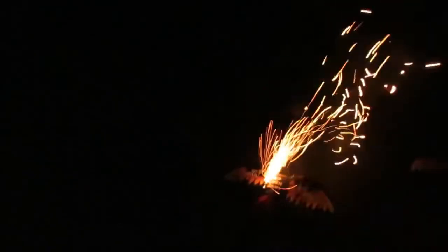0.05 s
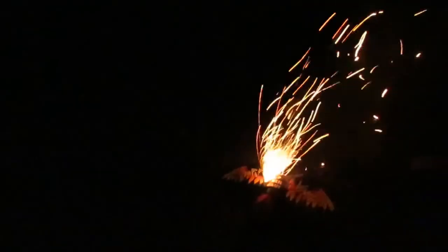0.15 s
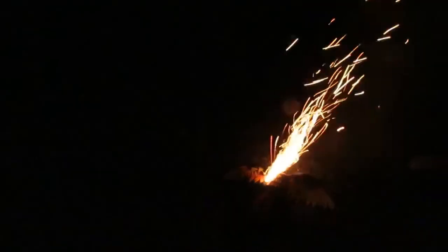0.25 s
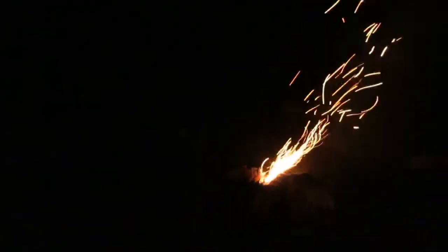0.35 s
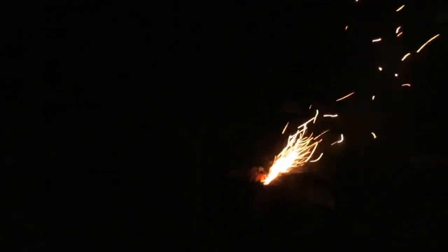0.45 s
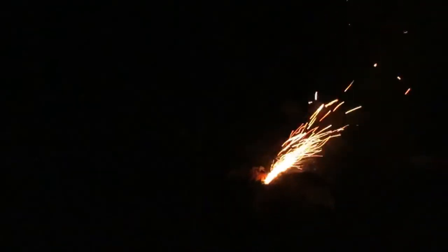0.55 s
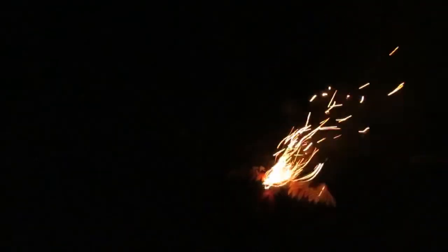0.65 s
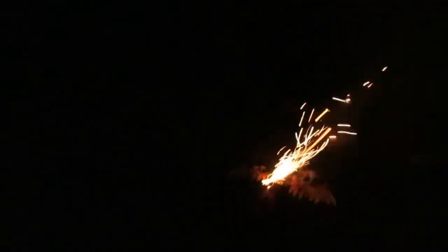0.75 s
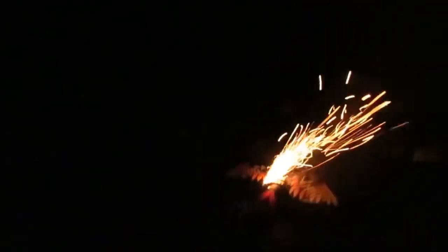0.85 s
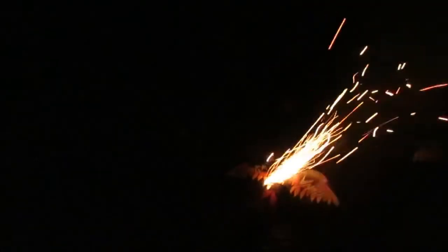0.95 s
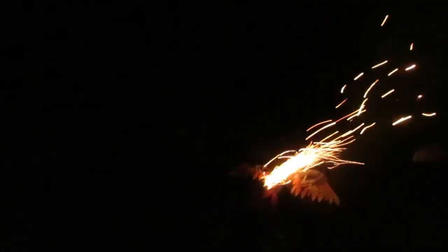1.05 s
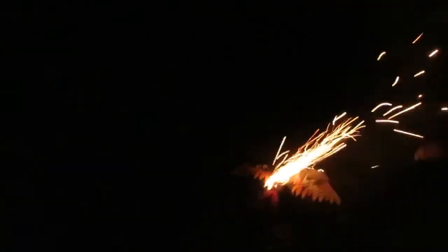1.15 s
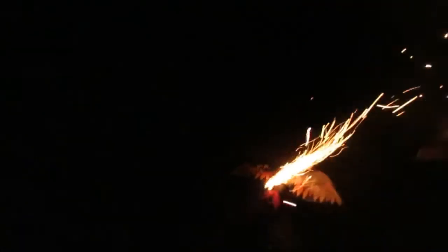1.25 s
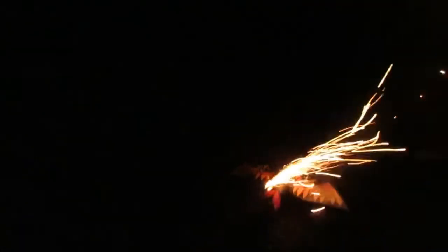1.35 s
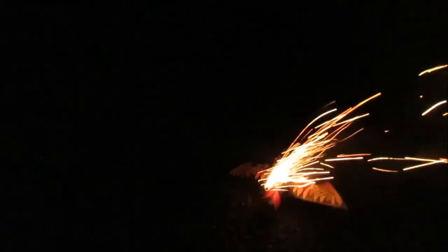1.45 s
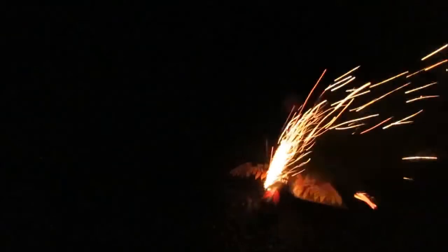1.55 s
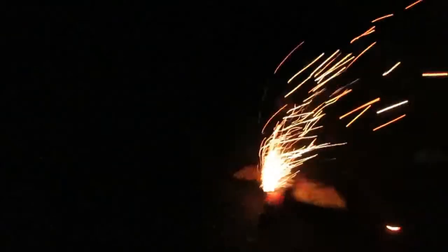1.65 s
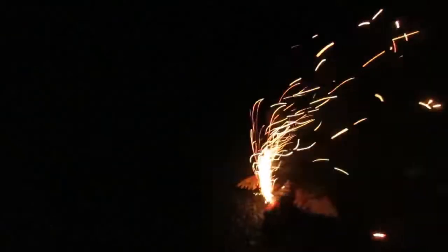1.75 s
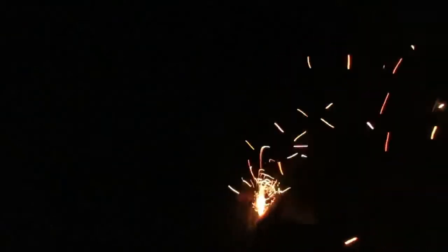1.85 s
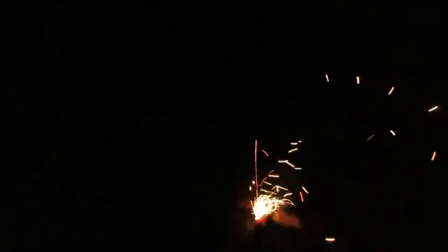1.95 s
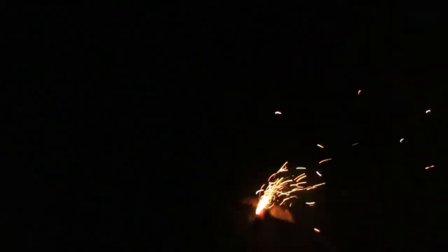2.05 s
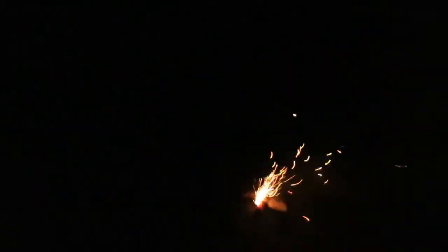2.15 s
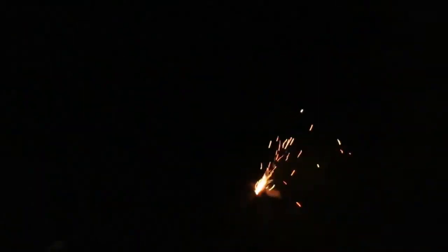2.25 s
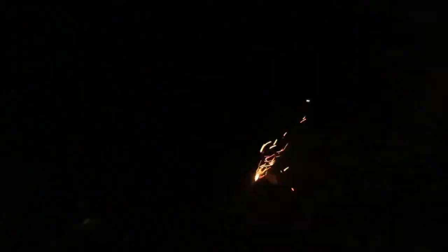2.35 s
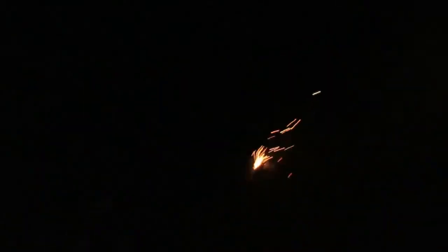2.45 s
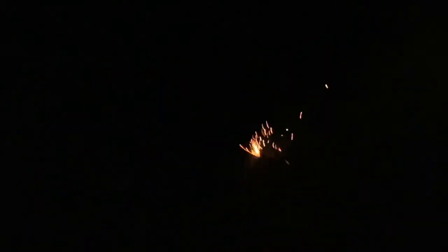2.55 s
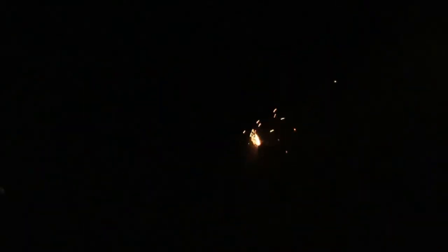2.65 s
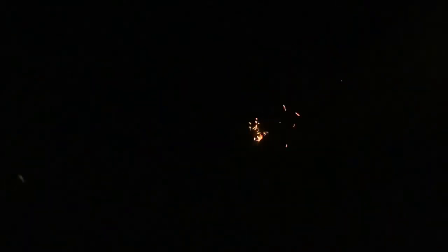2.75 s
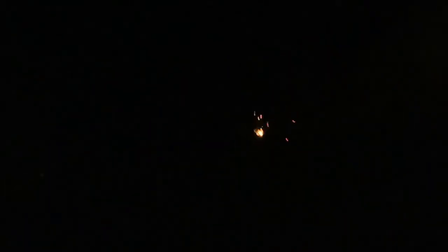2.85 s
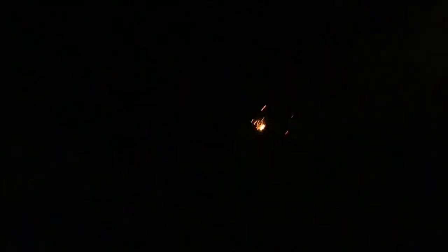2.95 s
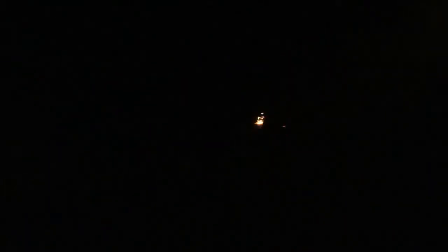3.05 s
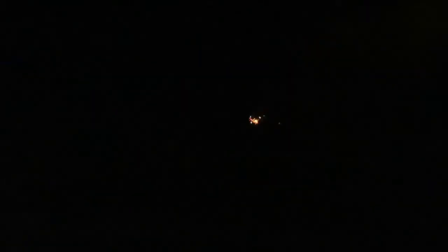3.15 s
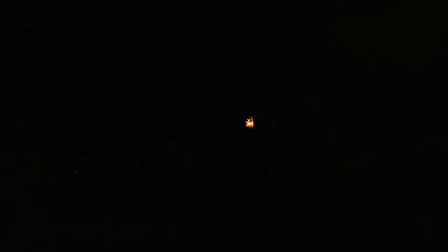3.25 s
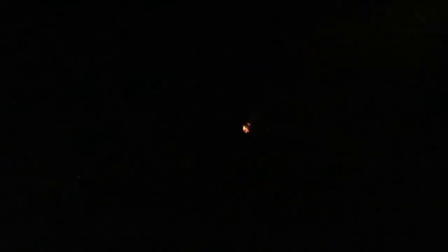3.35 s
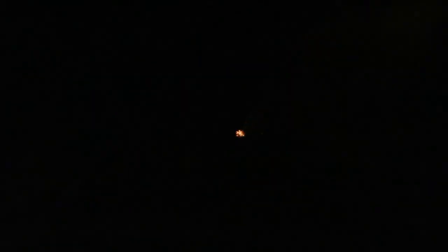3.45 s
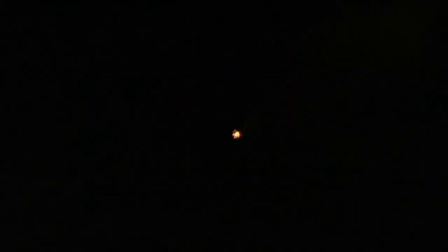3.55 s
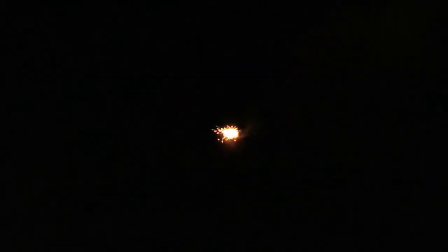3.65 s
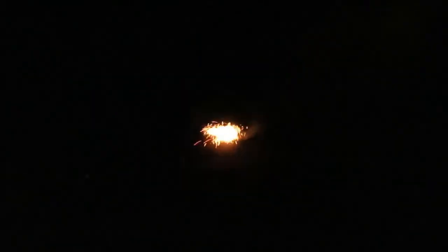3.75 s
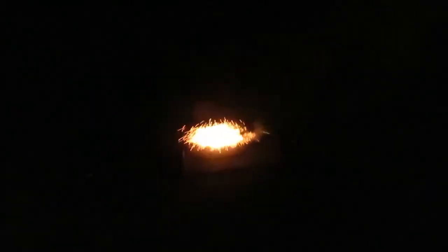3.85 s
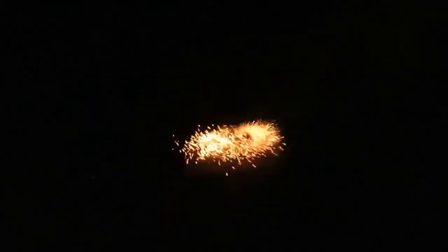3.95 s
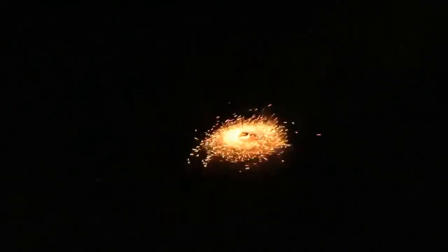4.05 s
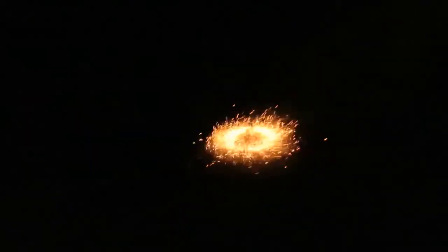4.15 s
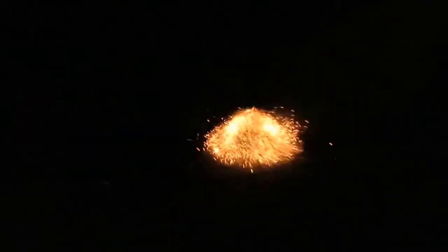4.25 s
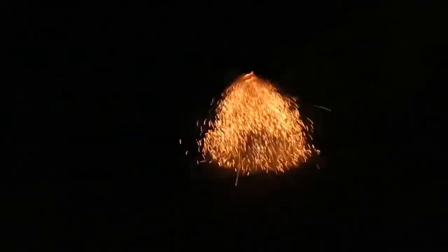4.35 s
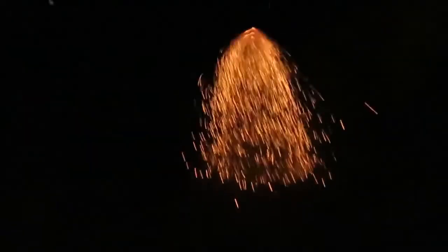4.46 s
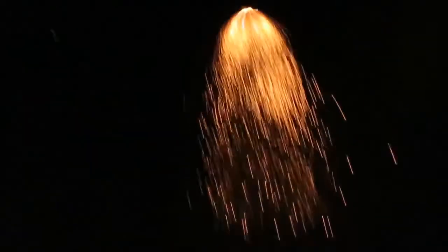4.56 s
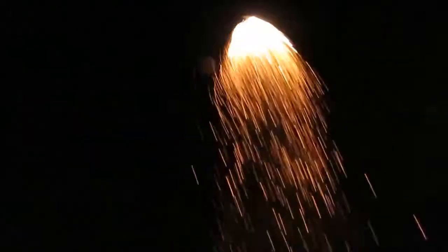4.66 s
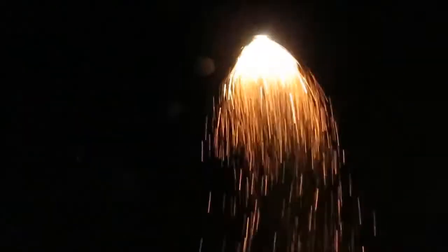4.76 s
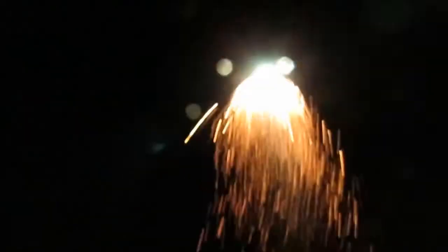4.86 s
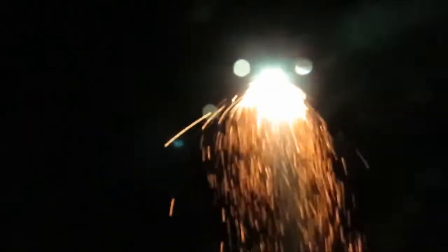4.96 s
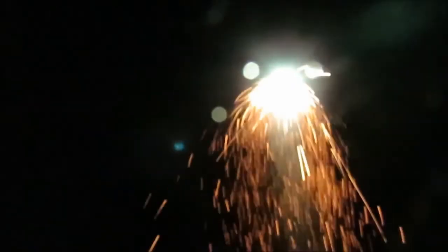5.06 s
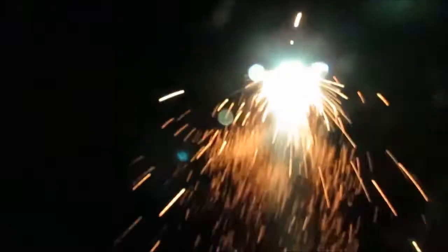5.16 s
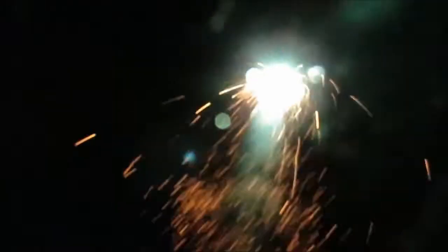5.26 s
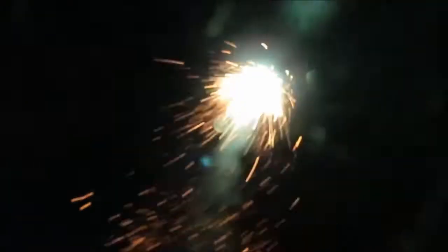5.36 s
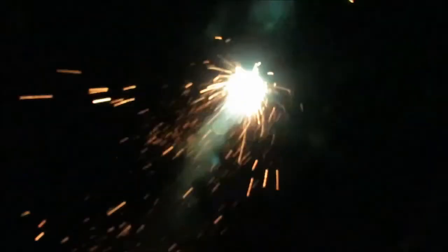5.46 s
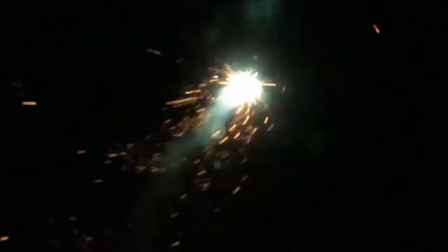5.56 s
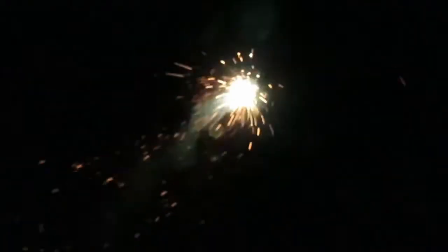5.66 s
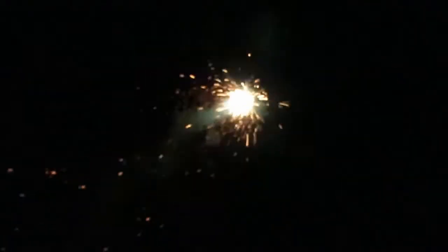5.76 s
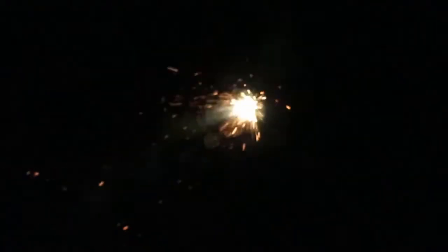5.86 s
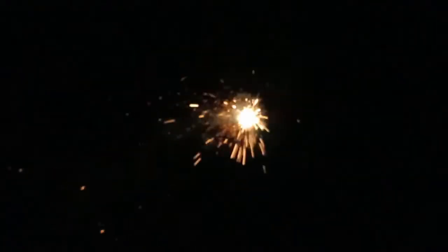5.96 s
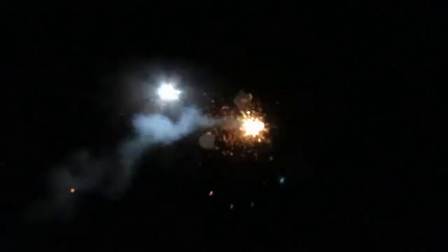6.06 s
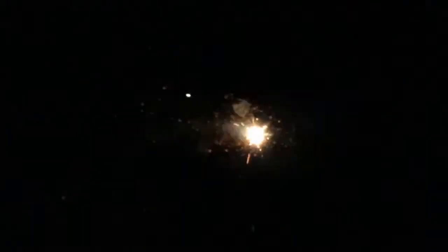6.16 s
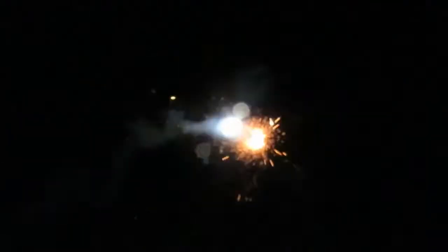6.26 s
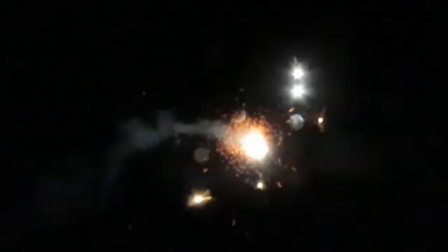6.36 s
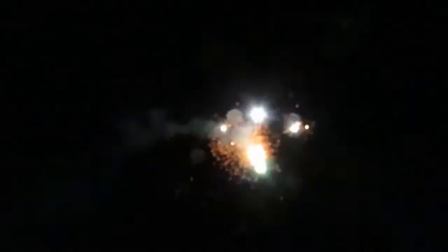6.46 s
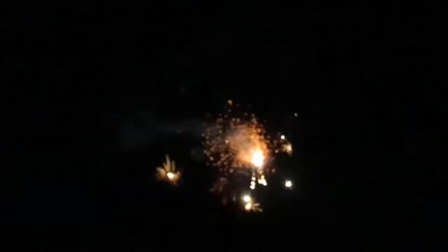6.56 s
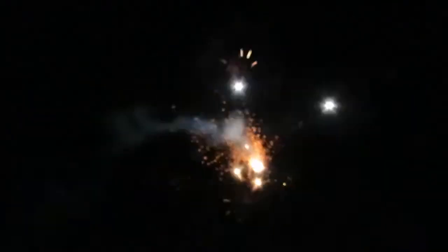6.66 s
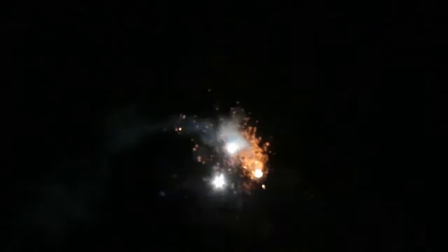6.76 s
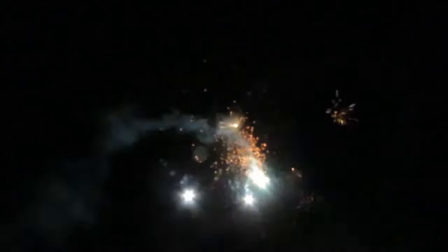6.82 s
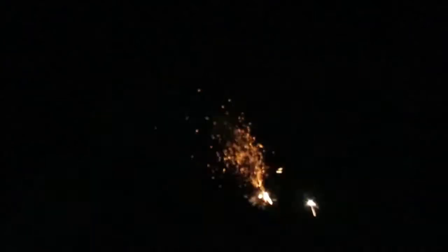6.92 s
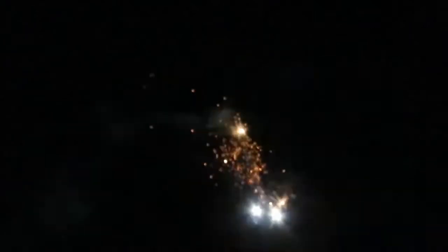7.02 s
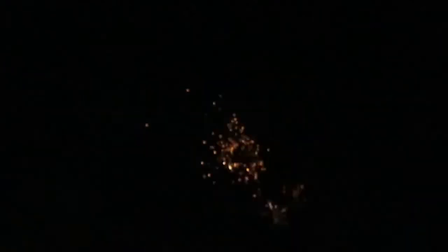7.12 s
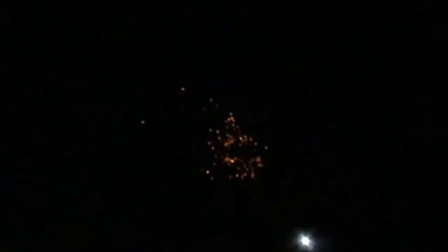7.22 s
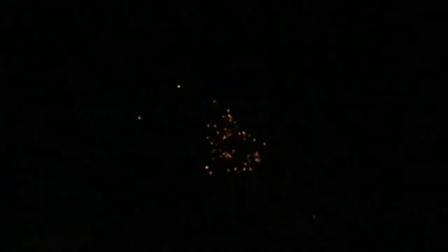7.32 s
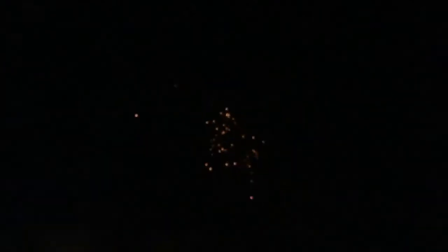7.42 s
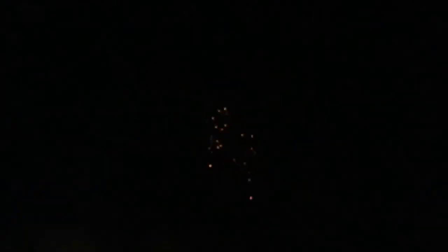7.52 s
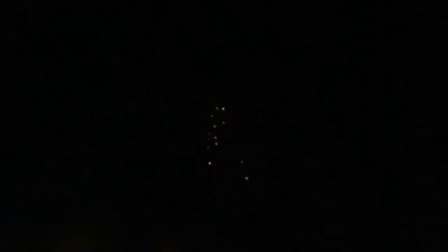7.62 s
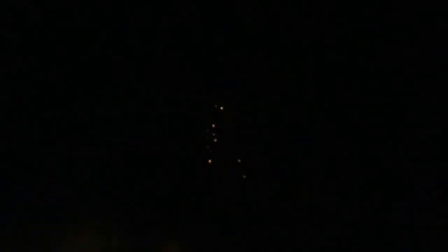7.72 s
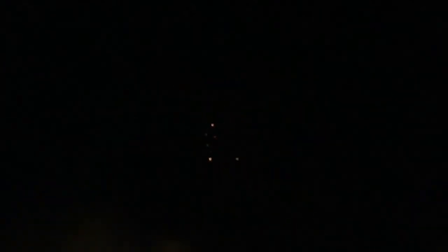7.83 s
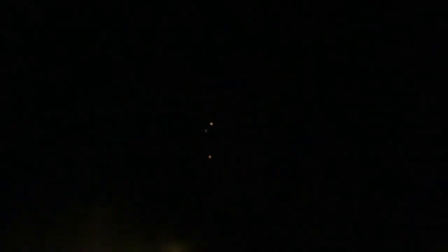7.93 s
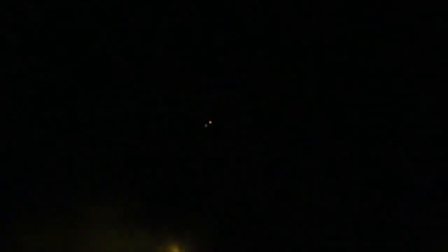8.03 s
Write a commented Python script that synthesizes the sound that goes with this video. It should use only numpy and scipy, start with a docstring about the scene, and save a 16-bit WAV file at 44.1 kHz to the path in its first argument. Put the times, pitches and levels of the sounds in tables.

```python
"""A winged firework at night. First its fuse fizzes on the ground, spurts and sputters out. Then the
charge lights: its turbulent jet spins faster and faster, beaming hiss past the listener once a turn,
and lifts off, the ground echo lagging as it climbs. Last, stars burst in crackling salvos of pressure
snaps that echo round a yard. Throughout, gusts thump the two ports of a small microphone over the
faint murmur of the open air."""
import sys
import numpy as np
from scipy import signal
from scipy.fft import rfft, irfft
from scipy.io import wavfile
from scipy.ndimage import uniform_filter1d, map_coordinates

SR = 44100
rng = np.random.default_rng(int(sys.argv[2]) if len(sys.argv) > 2 else 0)


def store_wav(level_fs):
    """Save 16-bit WAV to argv[1]."""
    pcm = np.round(np.clip(np.atleast_2d(level_fs), -1, 1) * 32767)
    wavfile.write(sys.argv[1], SR, pcm.T.astype(np.int16))


N = 356724
T = np.arange(N) / SR


def charge():
    """Rotating directivity: the jet beams its noise past once a turn, modulating the amplitude."""
    thrust = [(3.6, -55), (3.72, -34), (3.92, -17), (3.97, -10.5), (4.1, -15), (4.2, -15.5), (4.3, -14),
              (4.46, -14), (4.52, -19.5), (4.6, -27.5), (4.8, -22.5), (4.95, -14), (5.05, -14), (5.23, -20),
              (5.58, -17.5), (5.95, -21.5), (6.22, -28.5), (6.35, -48), (6.55, -39), (7.2, -52)]  # strength of the jet: time_s, level_db
    spectrum = [(110, -51.5), (180, -29), (460, -4.5), (1240, 0), (2230, 1), (2840, -3.5), (3200, -1),
                (3600, -4), (4650, -10), (5350, -3), (6140, -7), (7200, -2.5), (8100, -9), (10500, -8),
                (11900, -15), (13200, -11), (16000, -29.5)]  # jet noise: frequency_hz, density_db
    bass = [(3.6, 14), (3.85, -6.5), (4.04, -1.5), (4.11, 9), (4.3, -2), (4.48, -10.5), (4.58, -0.5),
            (5.6, -6), (6.1, 3.5), (6.35, 10)]  # weight of the bass: time_s, tilt_db
    spin = [(3.85, 5), (4.007, 7.5), (4.2, 23.5), (4.5, 74), (4.6, 77), (4.88, 65), (5.03, 70.5),
            (5.12, 77.5), (5.35, 85.3), (5.6, 90), (6.4, 89)]  # rotation: time_s, turns_per_s
    facing = [(3.9, 1), (4.08, 5), (4.36, 6), (4.5, 5.5), (4.62, 2), (4.9, 4), (5.15, 6), (5.3, 3.5),
              (5.85, 1.5)]  # depth of the sweep, evening out aloft: time_s, depth_db
    t = np.arange(thrust[0][0], thrust[-1][0], .01)
    thrust_db = curve(thrust, t)
    full_thrust_db, aloft_s, catch_s = -10.5, 4.86, 3.955
    tilt_db = np.minimum(-7.5 + 0.49 * (full_thrust_db - thrust_db), -2.5)  # brighter when weaker
    tilt_db += 5.5 * ramp(t, aloft_s, span_s=0.99)
    tilt_db += 7.5 * np.exp(-((t - catch_s) / 0.03) ** 2)  # bright surge as the charge catches
    hiss = jet_noise(lambda hz, t: at_hz(spectrum, hz), t, thrust_db, tilt_db, curve(bass, t),
                     patchy_db=1.1, gusty_db=.9)
    turns = np.cumsum(curve(spin)) / SR
    angle = 2 * np.pi * (turns - np.interp(4.003, T, turns))  # the nozzle faces the listener at 4.003 s
    sweep_db = curve(facing) * (np.cos(angle) + .3 * np.cos(2 * angle))  # the harmonic narrows the beam
    body = signal.sosfiltfilt(butterworth(2, 4500, "lowpass"), hiss)
    return body * gain_of(sweep_db) + (hiss - body) * gain_of(.65 * sweep_db)  # scattered treble sweeps less


def stars():
    """Impulsive sources: each star sends a pressure snap, directly and off the ground; crumbs follow."""
    bursts = [(5.9882, 0, 9, -12, -17), (6.1735, 1.5, 9.2, -9, -4), (6.1771, -7.3, 9, -7, -8),
              (6.2442, -6.2, 9, -7, -3), (6.2802, 1.5, 8.9, -7, -4), (6.3142, .5, 10.2, -11, -7),
              (6.3213, -3.7, 8.5, -12, -10), (6.3517, -10, 8, 0, -3), (6.3654, -5.9, 8.7, -6, -5),
              (6.3921, -15.1, 8, -3, -4), (6.2958, -12, 9, -12, -16), (6.438, -8.9, 8.9, -5, -6),
              (6.4519, -4.7, 10.6, -7, -9), (6.4625, -8, 9.2, -8, -8), (6.4692, -10.7, 9.1, -3, -4),
              (6.4843, -9.7, 8.5, -5, -13), (6.4948, -4.8, 11.3, -9, -10), (6.5024, -6.3, 9.1, -6, -13),
              (6.5549, -9.5, 8.7, -3, -6), (6.5608, -6.3, 8.6, -3, -4), (6.628, -8.3, 7.3, 0, -7),
              (6.6435, -6, 8.7, -1, -6), (6.6557, -8.6, 7.7, -7, -6), (6.6634, -12, 9.3, -2, -7),
              (6.7379, -6.1, 9.2, -4, -4), (6.7521, -10.6, 7.4, 0, -4), (6.7637, -5, 7.5, -7, -8),
              (6.7712, -7.5, 7.8, -5, -6), (6.7862, -17, 5, -6, -9), (6.8083, -8.6, 7.4, -1, -7),
              (6.8186, -7.3, 7.1, -2, -10), (6.83, -5.8, 6.9, -7, -8), (6.8369, -9, 6.2, -7, -14),
              (6.8431, -7, 5.7, -9, -13), (6.8724, -10.8, 5.9, -7, -3), (6.8783, -12, 7.3, -1, -7),
              (6.893, -6.8, 8.7, -3, -5), (6.906, -8.1, 7.3, 0, -10), (6.9219, -2.7, 7.3, -4, -14),
              (6.9334, -9.9, 7, -10, -3), (6.9448, -7.1, 6.5, 0, -8), (6.9556, -11.3, 8.1, 0, -9),
              (6.9708, -12.7, 7, -12, -11), (6.9838, -16, 7, -1, -5), (7.0197, -14.2, 8.1, -7, -7),
              (7.0278, -17, 6.8, -4, -7), (7.0886, -14, 6.8, -3, -5), (7.1119, -7.5, 4.8, 0, -7),
              (7.1262, -7.4, 7.6, -2, -6), (7.1509, -9.1, 5.9, -4, -9), (7.1659, -9.4, 6, 0, -9),
              (7.1778, -12.1, 7, -7, -2), (7.1848, -6, 7.6, -7, -3), (7.1924, -8, 7.3, 0, -6),
              (7.206, -12.8, 4.6, 0, -11), (7.222, -9, 6.1, -1, -12), (7.2331, -13.7, 5, -11, -8),
              (7.3688, -15, 4.7, -4, -9)]  # exploding stars: start_s, peak_db, echo_lag_ms, echo_db, treble_db
    spectrum = [(120, -41), (200, -16.5), (519, -7.5), (709, -11.5), (986, -3.5), (2290, -4.5),
                (3490, -12.5), (5040, -8), (10700, -18), (13600, -26.5), (16000, -62)]  # one snap: frequency_hz, density_db
    hz, t = np.fft.rfftfreq(4096, 1 / SR), np.arange(900) / SR
    sizzle = gain_of(-17) * np.exp(-t / 0.0006)
    fizz = gain_of(-28.5) * np.exp(-t / 0.025)
    snaps, impulses = np.zeros(N), np.zeros(N)
    for start_s, peak_db, lag_ms, echo_db, bright_db in bursts:
        direct = (start_s, peak_db, bright_db)
        bounced = (start_s + lag_ms / 1000, peak_db + echo_db, bright_db - 3.5)
        for arrival_s, db, treble_db in (direct, bounced):
            chance = rng.standard_normal(901)
            colour_db = at_hz(spectrum, hz * (1 + 0.09 * chance[0])) + (treble_db + chance[3]) * treble(hz)
            snap = minimum_phase(colour_db, size=300)
            snap = signal.lfilter([-.87, 1], [1, -.87], snap)  # all-pass: the front leads, the body follows
            tail = chance[1:] * sizzle + np.diff(chance) * fizz
            tail[0] = 1  # the snap itself
            reflection_s = .0015 + .00025 * np.clip(chance[1], -2, 2)  # varies with direction
            tail[round(SR * reflection_s)] = .4 + .1 * chance[2]
            snap = np.convolve(snap, tail)
            envelope = abs(signal.hilbert(snap))
            add(snaps, arrival_s - envelope.argmax() / SR, gain_of(db) * snap / envelope.max())
            add(impulses, arrival_s, gain_of([db]))
    wake = signal.lfilter([1], [1, -np.exp(-1 / (.01 * SR))], impulses)
    crumbs = wake * gain_of(-21 + 3 * np.minimum(rng.exponential(1, N), 3))
    crumbs *= rng.random(N) < 220 / SR  # about 220 a second
    dull_snap = minimum_phase(at_hz(spectrum, hz) - 12 * treble(hz), size=300)
    return snaps - signal.oaconvolve(crumbs, dull_snap / abs(dull_snap).max())[:N]


def fuse():
    """Combustion noise: the fuse sprays sparks with a hiss; spurts swell it and tilt its treble."""
    burn = [(0, -25, -3.5), (0.42, -25.5, 3), (0.46, -27.5, -5), (0.7, -27.5, 2.5), (0.75, -28.5, -4),
            (0.97, -27, -2.5), (1.48, -25, -5), (1.599, -24, 0.5), (1.74, -22, -5), (1.8, -17.5, -7),
            (1.93, -20.5, -8), (1.99, -31, -6.5), (2.42, -28.5, -11), (2.619, -35, -5.5), (3.3, -36, -4.5),
            (3.55, -38.5, 4), (3.75, -38, -9)]  # course of the burn: time_s, level_db, treble_db
    spurts = [(.55, 4.5, -3.5), (.93, 5, -2), (2.1, 3, 1), (2.3, 3.5, 6), (2.521, 2, -3), (2.849, 10.5, -1),
              (3.392, 12.5, -10.5)]  # brief surges: peak_s, swell_db, treble_db
    flare = [(1.68, -16), (1.8, -22), (1.93, -23), (2.0, -13.5)]  # the thin last flare: time_s, bass_db
    times, burn_db, treble_db = np.transpose(burn)
    t = np.arange(times[0], times[-1], .01)
    level_db, tilt_db = np.interp(t, times, burn_db), np.interp(t, times, treble_db)
    rise_s, fall_s = 0.082, 0.11
    for peak_s, swell_db, spurt_tilt_db in spurts:
        spurt = np.interp(t, [peak_s - rise_s, peak_s, peak_s + fall_s], [0, 1, 0])
        level_db += swell_db * spurt
        tilt_db += spurt_tilt_db * spurt
    return jet_noise(fuse_colour, t, level_db, tilt_db, curve(flare, t), patchy_db=1.5, gusty_db=1.5)


def fuse_colour(hz, t):
    """Interference: echoes from pavement and paper wings hollow the hiss until the fuse dies back."""
    open_fuse = [(180, -41), (300, 4.5), (749, 7.5), (885, -4.5), (1010, -0.5), (1720, -4), (2050, -12),
                 (2270, -8.5), (3500, -12), (5520, -16), (6000, -12), (9880, -11), (10900, -5.5),
                 (12500, -23), (14000, -14), (16000, -33)]  # the spraying fuse: frequency_hz, density_db
    hollows = [(2760, 390, -5), (4500, 1100, -4), (10050, 1240, -6)]  # broad cancellations: centre_hz, width_hz, gain_db
    ember = [(240, -37.5), (400, 5), (636, 4.5), (1420, -7), (2400, -11.5), (3400, -17.5), (4100, -15.5),
             (4900, -12.5), (6000, -21.5), (7050, -15), (8200, -21.5), (10000, -23.5), (12200, -27.5),
             (13400, -26.5), (16000, -38.5)]  # the fuse burning inside the body: frequency_hz, density_db
    spraying = at_hz(open_fuse, hz) + sum(db * np.exp(-((hz - f) / width) ** 2) for f, width, db in hollows)
    ridge, hollow = (np.exp(-((hz - f) / 630) ** 2) for f in (3650, 2520))
    rasp_db = 6.5 * (ridge - hollow) * (1 - ramp(t, 0, span_s=1.9))  # fades as the fuse burns in
    dying = ramp(t, 1.95, span_s=1)
    return (1 - dying) * (spraying + rasp_db) + dying * at_hz(ember, hz)


def spits():
    """Damped oscillation: powder grains pop over a puff of gas; a drier crack is shorter and noisier."""
    grains = [(0.038, -16.5, 1490, -25, 0.86), (1.986, -22, 1000, -40, 0.78),
              (2.001, -20.5, 2460, -45, 0.64), (2.231, -20, 1500, -40, 0.76), (2.302, -21, 1500, -40, 0.7),
              (2.498, -11, 1950, -10, 0.82), (2.5288, -15, 1400, -10, 0.55),
              (2.544, -22.5, 1160, -40, 0.32), (2.566, -20, 1820, -35, 0.79), (2.574, -26, 1380, -47, .35),
              (2.665, -25.5, 1300, -47, .15), (2.711, -23.5, 1290, -27, 0.34),
              (3.217, -31, 1500, -45, 0.97), (3.371, -25, 890, -41, .4), (5.0672, -2.5, 1550, -17, 0.87),
              (5.16, -3.5, 2100, -5, 0.67), (5.171, -8, 1630, -5.5, 0.57), (5.18, -14, 1590, -7, 0.22),
              (5.238, -7, 1980, -6, 0.85), (5.248, -11.5, 990, -26.5, 0.55),
              (5.616, -12.5, 1010, -29.5, 0.7), (5.68, -8, 2010, -25, .7), (6.087, -9.5, 1290, -12, 0.79)]  # pops of fuse and charge: start_s, peak_db, pitch_hz, puff_db, crack_share
    out, t = np.zeros(N), np.arange(600) / SR
    puff = np.sin(2 * np.pi * 330 * t) * np.exp(-t / 0.0014) * np.minimum(t / 0.002, 1)
    for start_s, peak_db, hz, puff_db, crack in grains:
        ring_s = .0024 * (1 - np.clip(crack, 0, .9))
        ring = np.sin(2 * np.pi * hz * t) * np.exp(-t / ring_s) * np.minimum(2 * t / ring_s, 1)
        noise = uniform_filter1d(rng.standard_normal(600), size=4) * np.exp(-t / 0.0043)
        pop = ring / abs(ring).max() + 0.57 * crack * noise
        add(out, start_s, gain_of(peak_db) * pop / abs(pop).max() + gain_of(puff_db) * puff)
    return signal.sosfilt(butterworth(2, 120, "highpass"), out)  # the pops carry no deep bass


def jet_noise(colour, times, level_db, treble_db, bass_db, patchy_db, gusty_db):
    """Turbulence: unsteady gas flow radiates broadband noise whose spectrum drifts in patches."""
    frames, hz = N // 128 + 5, np.fft.rfftfreq(512, 1 / SR)
    t = np.arange(frames) * 128 / SR
    real, imag, patches = rng.standard_normal((frames, 257, 3)).T
    patches = unit_rms(uniform_filter1d(uniform_filter1d(patches, 8, 0), 16, 1))
    tilt_db = np.interp(t, times, treble_db) * treble(hz)[:, None]
    tilt_db += np.interp(t, times, bass_db) * (1 - treble(hz, low_hz=705, high_hz=1702))[:, None]
    shape = gain_of(colour(hz[:, None], t))
    midrange = np.sqrt(np.sum(shape[(hz > 800) & (hz < 3000)] ** 2, axis=0))
    spectra = (real + 1j * imag) * shape / midrange * gain_of(tilt_db + patchy_db * patches)
    hiss = signal.istft(spectra, nperseg=512, noverlap=384)[1][:N] / 2
    return hiss * gain_of(np.interp(T, times, level_db, -120, -120) + gusty_db * wander(0.0022))


def ground_echo(x):
    """Comb filtering: from lift-off a duller ground reflection trails the climbing jet."""
    lags = [(4.2, .2), (4.35, 1), (4.6, 3.6), (4.9, 6.7), (5.2, 8.7), (5.7, 9.9), (6.15, 9.3), (6.5, 8.8)]  # extra travel by way of the ground: time_s, lag_ms
    parted = ramp(T, 4.15, span_s=.25)
    return x + gain_of(-6.5) * parted * uniform_filter1d(delayed(x, lags), size=3)


def near_echo(x):
    """Early reflection: a surface near the microphone repeats the treble with a sliding lag."""
    lags = [(0, 2.16), (1.68, 2.16), (1.78, 1.6), (4.0, 1.8), (4.95, 1.71), (5.3, 1.55), (5.55, 1.46),
            (5.85, 1.44), (6.2, 1.47)]  # extra travel by way of the surface: time_s, lag_ms
    strength = [(0, -11), (1.9, -11), (2.6, -18), (3.8, -18), (4.9, -10), (5.4, -7.5), (6.2, -7)]  # the reflected share: time_s, gain_db
    bright = signal.sosfiltfilt(butterworth(2, 5500, "highpass"), x)
    return x + gain_of(curve(strength) + 4 * wander(0.022)) * delayed(bright, lags)


def cancellations(x):
    """Destructive interference cuts narrow notches, which fill in when the firework shifts."""
    notches = [(4760, 260), (5630, 260), (8670, 200), (11760, 250)]  # cancelled bands: centre_hz, width_hz
    cut = x
    for hz, width_hz in notches:
        cut = signal.lfilter(*signal.iirnotch(hz, hz / width_hz, SR), cut)
    lying_still = 1 - ramp(T, 1.72, span_s=.25)
    return x - .9 * (x - cut) * lying_still


def yard(x, gap_s=.005):
    """Reverberation: sparse random echoes from walls and trees, each band dying at its own rate."""
    decay = [(200, 0.36), (700, 0.72), (2000, 0.81), (5000, 1), (9000, 0.41), (15000, 0.22)]  # reverberation time: frequency_hz, t60_s
    taps = np.zeros((2, 2 * SR))
    slots = np.arange(round(gap_s * SR), 2 * SR - 20, 20)
    arrivals = slots + rng.integers(0, 20, (2, len(slots)))
    np.put_along_axis(taps, arrivals, rng.choice([-1., 1.], arrivals.shape), 1)
    hz, t, spectra = signal.stft(taps, SR, nperseg=256)
    tail = signal.istft(spectra * gain_of(-60 * t / at_hz(decay, hz)[:, None]), SR, nperseg=256)[1]
    return signal.fftconvolve(x[None], tail / np.linalg.norm(tail[0]), axes=1)[:, :N]


def port_difference(x):
    """Decorrelation: two scattered copies crossfade, making the treble wide and diffuse."""
    ports = [(60, -14.5), (150, -29.5), (380, -24), (950, -33.5), (2380, -28.5), (5980, -17.5),
             (11500, -3.5), (15000, -4.5)]  # port difference against the sum: frequency_hz, gain_db
    apart = minimum_phase(at_hz(ports, np.fft.rfftfreq(4096, 1 / SR)), size=256)
    scatter = rng.standard_normal((2, 600)) * np.exp(-np.arange(600) / 110.0)
    first, second = (signal.oaconvolve(x, np.convolve(apart, path / np.linalg.norm(path)))[:N]
                     for path in scatter)
    crossfade = 2 * np.pi * (3 * T + wander(.3))  # about three cycles a second
    return first * np.cos(crossfade) + second * np.sin(crossfade)


def wind():
    """Pseudo-sound: eddies press directly on the ports as low lumps, one-cycle thumps and rumble."""
    gusts = [(0, -47, -54), (0.9, -45, -44), (1.86, -47.5, -53), (1.98, -29.5, -14.5), (2.07, -36, -23.5),
             (2.25, -42, -29), (2.43, -42, -52), (2.52, -35, -43), (2.58, -40, -45), (2.7, -40, -37.5),
             (2.73, -29.5, -37), (2.79, -28.5, -26), (3.03, -34.5, -43), (3.12, -51, -53),
             (3.51, -55.5, -61), (3.65, -35.5, -31), (3.96, -37, -45), (4.32, -33.5, -39),
             (4.55, -52, -63.5), (4.9, -38.5, -45), (5.5, -43, -48), (6.1, -42, -56.5), (7.3, -71.5, -88),
             (7.75, -61, -73), (8.05, -81.5, -88)]  # eddy pressure at the two ports: time_s, common_db, opposed_db
    thumps = [(1.954, -4.5, -4.5, 205), (1.976, -11, -22, 250), (1.994, -4, -6, 170),
              (2.233, -9.5, -9.5, 170), (2.612, -15, -20, 165), (2.682, -21, -18, 200),
              (2.74, -16, -16, 130), (2.776, -16, -20, 312), (2.798, -25, -14, 199), (2.842, -5.5, -7, 232),
              (2.986, -11, -13.5, 220), (3.031, -13, -9, 210), (3.633, -15, -9, 242)]  # single strong eddies: centre_s, left_db, right_db, pitch_hz
    rumble = [(.3, -59), (1.0, -45.5), (1.6, -69), (2.0, -38.5), (2.3, -39.5), (2.55, -55), (2.74, -39),
              (3.0, -41), (3.3, -54), (3.7, -47), (4.5, -58), (6.3, -62.5), (7.3, -85), (7.8, -72.5)]  # deep wind pressure: time_s, level_db
    times, common_db, opposed_db = np.transpose(gusts)
    lumps = []
    for db, band_hz in ((common_db, [100, 330]), (opposed_db, [130, 380])):
        eddies = rng.standard_normal(N) * gain_of(6.5 * np.minimum(wander(.01), 1.2))
        eddies = signal.sosfilt(butterworth(4, band_hz, "bandpass"), eddies)
        lumps.append(unit_rms(eddies) * gain_of(np.interp(T, times, db)))
    common, opposed = lumps
    out = np.array([common + opposed, common - opposed])
    t = np.arange(-400, 400) / SR
    port_rad = np.array([[0], [-2.18]])  # an eddy pushes one port while it pulls the other
    for centre_s, left_db, right_db, hz in thumps:
        thump = np.cos(2 * np.pi * (hz * t + rng.random()) + port_rad) * np.exp(-(t * hz / 0.28) ** 2)
        add(out, centre_s + t[0], gain_of([[left_db], [right_db]]) * thump)
    out = signal.sosfilt(butterworth(2, 70, "highpass"), out)  # the ports are vented
    deep = rng.standard_normal(N) * gain_of(2.4 * wander(0.04))
    deep = signal.sosfilt(butterworth(3, [45, 120], "bandpass"), deep)
    return out + unit_rms(deep) * gain_of(curve(rumble))


def night(level_db=-61.5):
    """Ambient noise: the faint, steady, distant murmur of the open air."""
    spectrum = [(24, -52), (40, -12), (86, -11.5), (432, 0), (1470, 3.5), (2420, 3), (9000, -34),
                (11700, -63.5), (19800, -120)]  # night air: frequency_hz, density_db
    murmur = rfft(rng.standard_normal(N)) * gain_of(at_hz(spectrum, np.fft.rfftfreq(N, 1 / SR)))
    return gain_of(level_db) * unit_rms(irfft(murmur, N))


def gain_of(db):
    """Decibels to amplitude."""
    return 10 ** (np.asarray(db) / 20)


def unit_rms(x):
    """Scales to rms 1."""
    return x / np.sqrt(np.mean(x ** 2) + 1e-20)


def curve(points, t=T):
    """Linear interpolation of a time table."""
    return np.interp(t, *np.transpose(points))


def at_hz(points, hz):
    """Interpolation of a spectrum table on a log-frequency axis."""
    f, value = np.transpose(points)
    return np.interp(np.log(hz + 1), np.log(f + 1), value)


def ramp(t, start_s, span_s):
    """Linear rise from 0 to 1."""
    return np.clip((t - start_s) / span_s, 0, 1)


def treble(hz, low_hz=2500, high_hz=7000):
    """Shelf from 0 in the body to 1 in the treble."""
    return np.clip(np.log((hz + 1) / low_hz) / np.log(high_hz / low_hz), 0, 1)


def butterworth(order, hz, kind):
    """Maximally flat filter sections."""
    return signal.butter(order, hz, kind, fs=SR, output="sos")


def minimum_phase(db, size):
    """Causal impulse with the given gain on a 4096-point grid."""
    log_gain = np.log(gain_of(np.maximum(db, -100)))
    circle = np.r_[log_gain, log_gain[-2:0:-1]]
    return np.fft.ifft(np.exp(circle - 1j * signal.hilbert(circle).imag)).real[:size]


def add(mix, start_s, sound):
    """Superposes a sound on the mix."""
    part = mix[..., round(start_s * SR):][..., :sound.shape[-1]]
    part += sound[..., :part.shape[-1]]


def wander(span_s):
    """Smoothed noise of rms 1 that changes over span_s."""
    size = max(round(span_s * SR), 1)
    return unit_rms(uniform_filter1d(uniform_filter1d(rng.standard_normal(N), size), size))


def delayed(x, lags):
    """Variable delay along a lag curve in ms."""
    return map_coordinates(x, [np.arange(N) - curve(lags) * SR / 1000], order=3, mode="nearest")


def scene():
    """Superposition of sources, echoes and wind; the cancellations hollow only what the ports share."""
    fizz = fuse()
    jets = ground_echo(charge()) + spits()
    bursts = stars()
    burning = cancellations(fizz) + jets
    echo = yard(gain_of(-16) * burning + gain_of(-13) * bursts)
    mid = near_echo(burning) + bursts + echo[0] + night()
    aside = gain_of(6.5) * bursts  # stars burst off to the sides, so the ports differ more
    side = port_difference(fizz + jets + aside + echo[0]) + gain_of(-12) * echo[1]
    return mid + side * [[1], [-1]] + wind()


def record(dry, edge_hz=16200):
    """Soft saturation rounds the loudest snaps; a low-pass filter then limits the band."""
    saturated = 1.23 * np.tanh(dry / 1.191)
    lowpass = signal.firwin(511, edge_hz, window=("kaiser", 9), fs=SR)
    return signal.oaconvolve(saturated, lowpass[None], "same")


dry = scene()
out = record(dry)
store_wav(out)
```